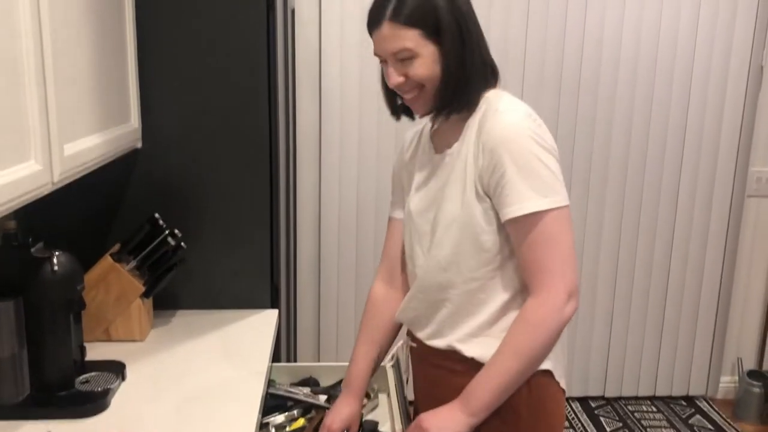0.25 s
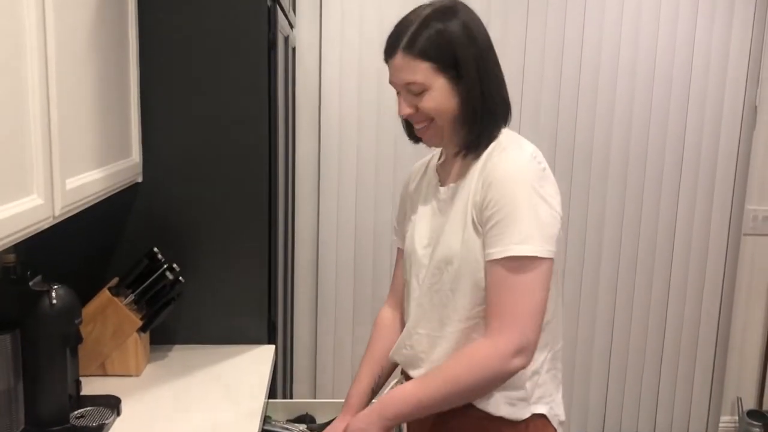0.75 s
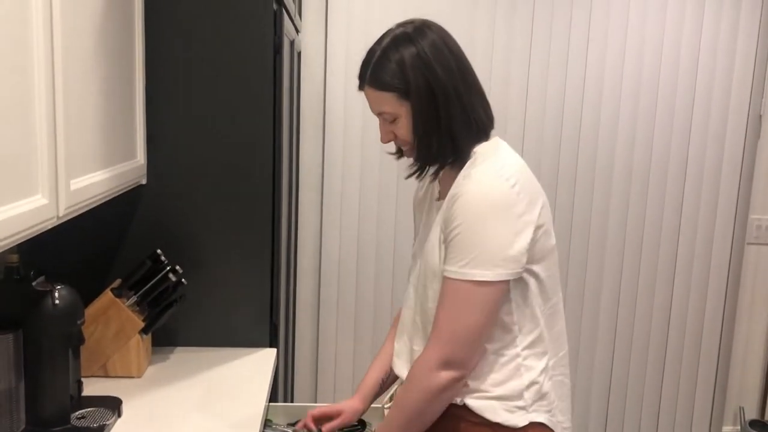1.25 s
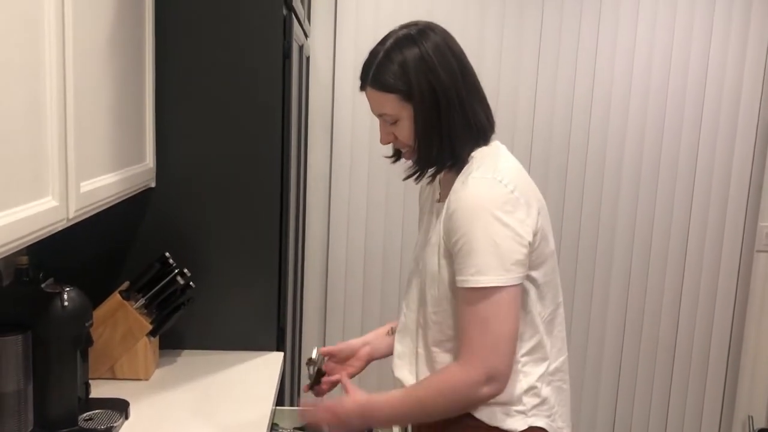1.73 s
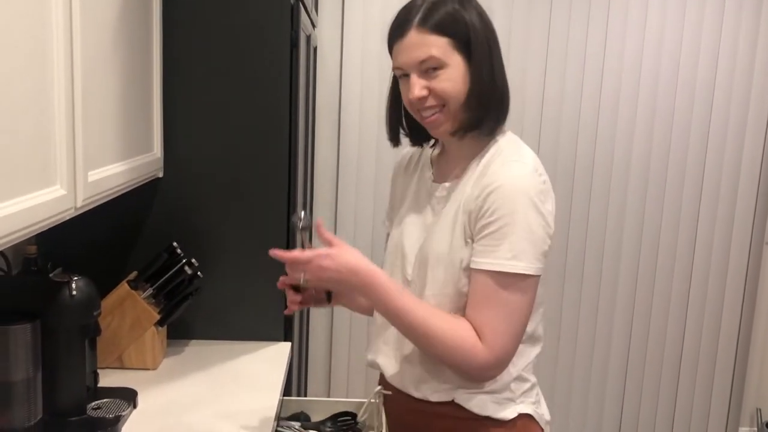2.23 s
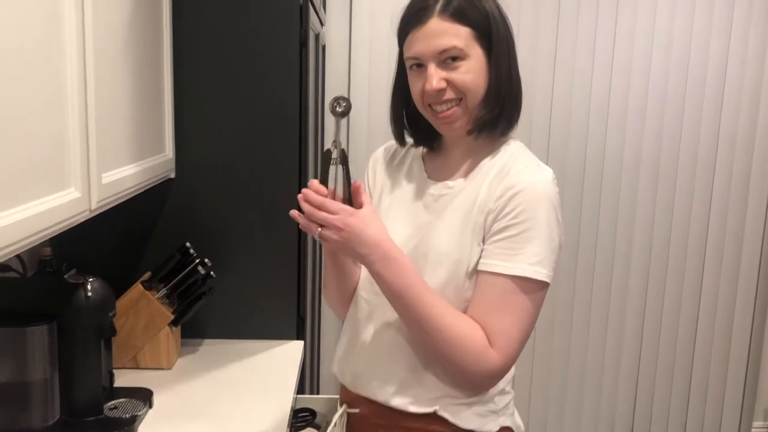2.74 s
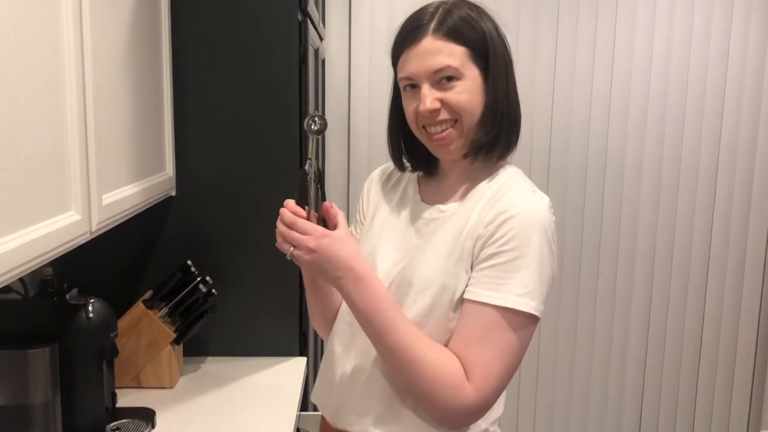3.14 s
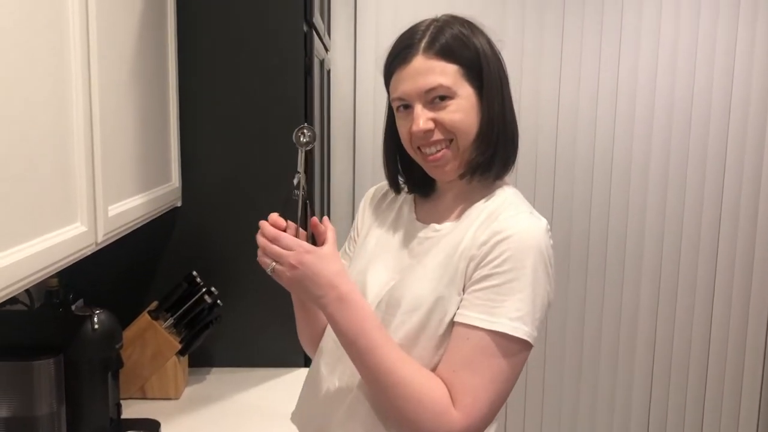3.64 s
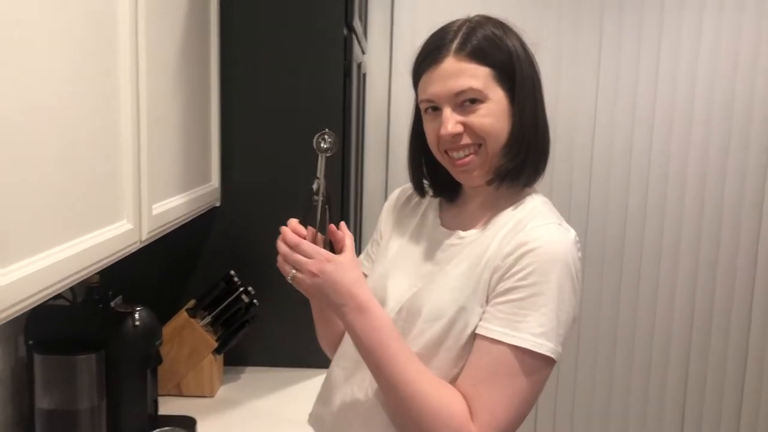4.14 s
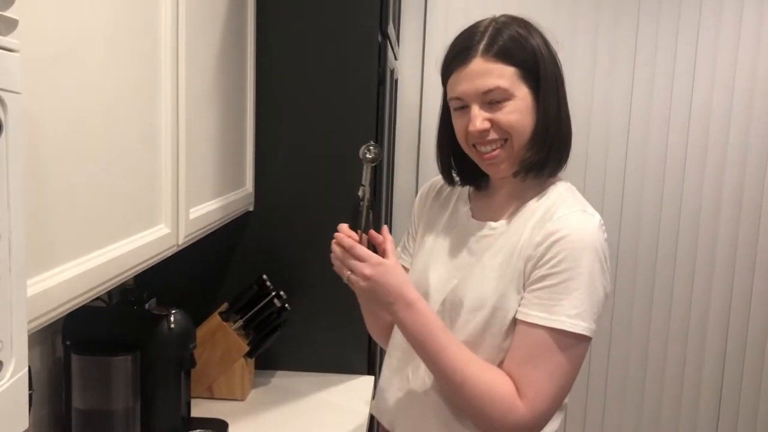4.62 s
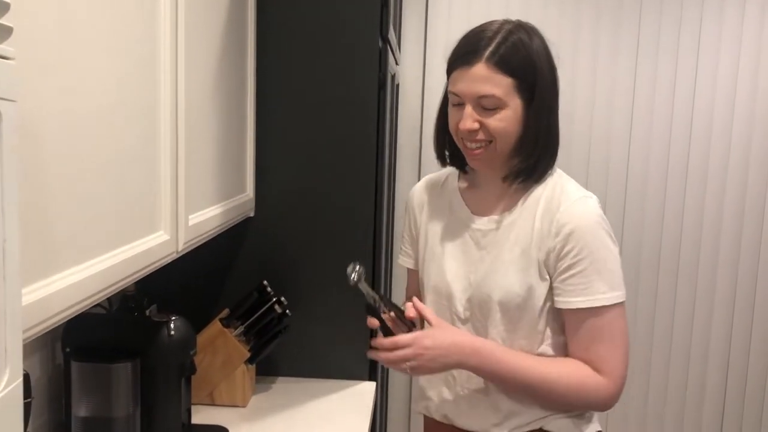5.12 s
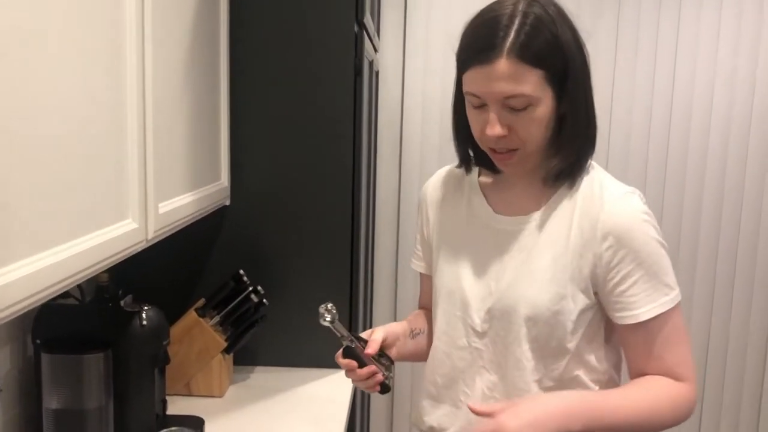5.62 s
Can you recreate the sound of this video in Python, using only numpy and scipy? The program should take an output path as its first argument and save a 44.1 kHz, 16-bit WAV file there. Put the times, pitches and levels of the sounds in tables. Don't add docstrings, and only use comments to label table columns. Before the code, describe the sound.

Steel utensils clatter in a shoved wooden drawer that bangs closed, followed by a dozen quick ratcheting scoop clicks and one dull knock.

```python
import sys
import numpy as np
from scipy import signal
from scipy.fft import rfft, irfft, next_fast_len
from scipy.io import wavfile
from scipy.ndimage import uniform_filter1d, map_coordinates

SR = 44100
rng = np.random.default_rng(int(sys.argv[2]) if len(sys.argv) > 2 else 0)


def to_linear_factor(level_db):
    exponent = np.asarray(level_db, float) / 20
    return 10 ** exponent


def log_audio(samples):
    frames = np.atleast_2d(samples).T
    limited = np.clip(frames, -1, 1)
    pcm = np.round(limited * 32767).astype(np.int16)
    wavfile.write(sys.argv[1], SR, pcm)


N = 258922


def unit(x):
    return x / np.sqrt(np.mean(x ** 2) + 1e-20)


def along(points, hz):
    point_hz, value = np.transpose(points)
    return np.interp(np.log(hz + 1), np.log(point_hz + 1), value)


def filtered(x, response):
    size = next_fast_len(len(x) + 8192)
    return irfft(rfft(x, size) * response(np.fft.rfftfreq(size, 1 / SR)), size)[:len(x)]


def noise(spectrum, size=N, grit_db=0):
    raw = rng.standard_normal(size) * to_linear_factor(grit_db * rng.exponential(1, size))
    return unit(filtered(raw, lambda hz: to_linear_factor(along(spectrum, hz))))


def wobble(rate):
    knots = rng.standard_normal(int(N * rate / SR) + 4)
    return map_coordinates(knots, [np.arange(N) * rate / SR])


def dying(t60, rise, seconds):
    t = np.arange(round(seconds * SR)) / SR
    return to_linear_factor(-60 * t / t60) * (1 - np.exp(-t / rise))


def ring(modes, scatter_db, rise, detune=0, seconds=0.65):
    t = np.arange(round(seconds * SR)) / SR
    total = np.zeros(len(t))
    for hz, db, t60 in modes:
        strength, shift = rng.standard_normal(2)
        tone = np.sin(2 * np.pi * hz * (1 + detune * shift) * t)
        total += to_linear_factor(db + scatter_db * strength) * tone * dying(t60, rise, seconds)
    return total


def add(track, s, x):
    start = round(s * SR)
    track[start:][:len(x)] += x[:N - start]


def curve(rows):
    s, db = np.transpose(rows)
    return np.interp(np.arange(N) / SR, s, db, left=-150, right=-150)


def ramp(start, end, start_db, end_db, t60):
    rise = to_linear_factor(np.linspace(start_db, end_db, round((end - start) * SR)))
    return np.r_[rise, rise[-1] * dying(t60, 1e-5, t60)]


# pitch_hz, width_hz, level_db
BOX_MODES = [(265, 37, 2), (479, 72, -1.5), (1276, 34, -14.5), (1590, 36, -10), (2046, 44, -24.5)]


def boxed(x):
    def lift(f):
        resonance = sum(to_linear_factor(db) * f * w / (c * c - f * f + 1j * f * w) for c, w, db in BOX_MODES)
        return 0.57 + abs(resonance) / to_linear_factor(max(db for _, _, db in BOX_MODES))
    return unit(filtered(x, lift))


# pitch_hz, density_db per Hz
AIR_SPECTRUM = [(13, -58.5), (22, -34), (46, -6.5), (83, -26), (122, -3), (156, -17), (200, -0.5),
                (319, -12.5), (420, -10), (469, -28.5), (539, -20.5), (815, -21.5), (1040, -23.5),
                (1450, -31), (16000, -46.5)]
# pitch_hz, width_hz, level_db
FRIDGE_HUM = [(209, 44, -70.5), (411.7, 21, -77.5), (1031, 22, -80.5)]
# pitch_hz, level_db
COMPRESSOR = (57.5, -69.5)


def kitchen():
    motor_hz, motor_db = COMPRESSOR
    phase = 2 * np.pi * np.cumsum(motor_hz + 0.99 * wobble(3.1)) / SR
    out = to_linear_factor(motor_db + 1.7 * wobble(5.8)) * np.sin(phase)
    for centre, width, db in FRIDGE_HUM:
        band = lambda f: 1 / (1 + (2 * (f - centre) / width) ** 2)
        out += to_linear_factor(db) * unit(filtered(rng.standard_normal(N), band))
    return out + to_linear_factor(-67 + 0.65 * wobble(4.8)) * noise(AIR_SPECTRUM)


# pitch_hz, density_db per Hz
WOOD_SPECTRUM = [(180, -23), (300, -3), (390, -4.5), (478, -4), (600, -3), (1400, -5.5), (4000, -25),
                 (5200, -60), (8800, -120)]
THUD_SPECTRUM = [(24, -55.5), (40, -42.5), (89, -5), (162, -2.5), (235, -6), (320, -7.5), (390, -15),
                 (520, -42), (880, -120)]
CLOTH_SPECTRUM = [(880, -22.5), (1500, -4.5), (1830, -9.5), (4080, -10), (8240, -20), (15100, -29),
                  (16000, -30)]
# time_s, level_db
DRAGGED_LOAD = [(.2, -71), (.3, -78), (.4, -58), (.42, -52), (.63, -53), (.74, -48), (.84, -52.5),
                (.87, -44), (1.1, -55.5)]
# start_s, end_s, start_db, end_db, t60_s
RUNNERS = (1.12, 1.33, -55, -38, 0.89)
# time_s, level_db
HAND_MOVES = [(0, -73.5), (.3, -67.5), (1.7, -74.5), (2.0, -69.5), (2.05, -65.5), (2.4, -62), (2.45, -59),
              (2.62, -57), (2.79, -61), (2.9, -67.5), (3.8, -65.5), (4.0, -65.5), (4.4, -67), (5.33, -68),
              (5.42, -62.5), (5.58, -66.5), (5.68, -65.5), (5.87, -70)]
# time_s, level_db
FOOTSTEPS = [(0, -65), (1.0, -63), (1.5, -58.5), (1.7, -67), (2.05, -66.5), (2.27, -53), (2.5, -55.5),
             (2.88, -57.5), (3.04, -61.5), (3.8, -60), (3.9, -50), (4.06, -63), (4.5, -69.5), (5.4, -69.5),
             (5.6, -67), (5.87, -72)]
# start_s (first tooth), home_s, tooth_db, home_db, scrape_db
SCOOP_SQUEEZES = [(2.8, 2.861, -50, -29.5, -56.5), (3.022, 3.0683, -46, -26.5, -53),
                  (3.174, 3.2143, -46, -29, -53.5), (3.347, 3.397, -39, -30.5, -53.5),
                  (3.5127, 3.56, -41, -28, -53), (3.669, 3.7277, -42, -36.5, -54),
                  (3.8538, 3.902, -40, -28.5, -51.5), (4.04, 4.09, -52, -29.5, -55.5),
                  (4.2174, 4.2585, -44, -24.5, -53.5), (4.435, 4.4834, -50, -30, -55.5),
                  (4.581, 4.622, -54, -24, -55.5), (4.862, 4.8944, -43, -32, -57)]


def handling():
    drag_db, hands_db, feet_db = curve(DRAGGED_LOAD), curve(HAND_MOVES), curve(FOOTSTEPS)
    shut, grip = np.zeros((2, N))
    add(shut, RUNNERS[0], ramp(*RUNNERS))
    for start, _, _, _, db in SCOOP_SQUEEZES:
        add(grip, start, to_linear_factor(db - 3) * dying(0.61, 0.014, 0.61))
    joint = lambda *levels: np.sqrt(np.sum(np.square(levels), axis=0))
    rumble = joint(to_linear_factor(feet_db), to_linear_factor(-61 + 0.4 * (drag_db + 50.5)))
    body = joint(to_linear_factor(drag_db), shut, to_linear_factor(hands_db))
    sleeve = to_linear_factor(-70 + 0.96 * (hands_db + 64))
    rustle = joint(to_linear_factor(drag_db - 20.5), to_linear_factor(-15) * shut, grip, sleeve)
    lumps = wobble(25)
    joists = noise([(30, -40), (55, -4.5), (100, -2.0), (140, -19), (300, -120)])
    out = rumble * to_linear_factor(1.8 * wobble(11) - 6.0) * noise(THUD_SPECTRUM)
    out += to_linear_factor(feet_db - 11.0 + 1.9 * wobble(10)) * joists
    out += body * to_linear_factor(1.4 * lumps - 3) * boxed(noise(WOOD_SPECTRUM, grit_db=1.8))
    return out + rustle * to_linear_factor(1.5 * lumps - 4.0) * noise(CLOTH_SPECTRUM, grit_db=2.5)


# start_s, pitch_hz, level_db, t60_s
SHUDDERS = [
    (3.849, 73.3, -41.5, 0.6),
    (3.883, 55.7, -51, 1),
    (3.95, 71.7, -36.5, 0.24),
]


def boom():
    out = np.zeros(N)
    for s, hz, db, t60 in SHUDDERS:
        add(out, s, ring([(hz, db, t60)], scatter_db=0.5, rise=0.014))
    return out


# start_s, level_db, rub_t60_s
KNOCKS = [
    (3.838, -38.5, 0.035),
    (3.858, -48.5, 0.05),
    (3.873, -46, 0.046),
    (3.905, -49.5, 0.038),
    (3.96, -51.5, 0.02),
]
# pitch_hz, level_db, t60_s
PANEL_MODES = [(114, -11, 0.069), (254, -13, 0.17), (443, -4, 0.08), (478, 4.5, 0.069), (781.5, 2, 0.12),
               (1006, -8, .06), (1165, 4, 0.14), (1222, 2, 0.16), (1265, -5.5, 0.38), (1440, -14, 0.06),
               (1560, -5, .06), (1770, -4, 0.093), (1884, -9, 0.078), (802, -9, 0.45)]


def knock():
    out = np.zeros(N)
    for s, db, t60 in KNOCKS:
        rub = dying(t60, 0.00017, .2) * noise(WOOD_SPECTRUM, size=SR // 5)
        thud = dying(6.0 * t60, 0.0045, .2) * noise(THUD_SPECTRUM, size=SR // 5)
        add(out, s, to_linear_factor(db - 6.0) * ring(PANEL_MODES, scatter_db=1.2, rise=0.001, detune=.012))
        add(out, s, to_linear_factor(db + 2.5) * rub)
        add(out, s, to_linear_factor(db - 3.0) * thud)
    return out


# pitch_hz, level_db, t60_s
CARCASS_MODES = [(114, -10.5, 0.14), (158, -7.5, 0.055), (210, -7, 0.65), (249.6, 1.5, 0.24),
                 (315, -5, 0.21), (462, -3.5, 0.3), (520, -7, 0.24), (720, -13, .4), (797, -15.5, 0.36),
                 (1240, -3.5, .17), (1303, -6, 0.18), (1410, -12, 0.23), (1560, -13.5, 0.21),
                 (2040, -14.5, 0.26)]
# start_s, level_db, hardness_db per octave
HARD_SHOVES = [
    (.261, -52.5, -7.5),
    (.849, -44.5, -2),
    (1.238, -29.5, 0.5),
    (1.262, -39, 1.5),
]


def cabinet():
    out = np.zeros(N)
    for s, db, hard_db in HARD_SHOVES:
        modes = [(hz, level + hard_db * np.log2(hz / 250), t60) for hz, level, t60 in CARCASS_MODES]
        add(out, s, to_linear_factor(db) * ring(modes, scatter_db=1.5, rise=0.006, detune=0.0075))
    return out


# start_s, peak_db, clatter_db (relative), thud_db (relative), hardness_db
DRAWER_JOLTS = [(0.165, -52, -26, -19, 1.5), (0.262, -43.5, -12.5, -7, 0.5), (0.392, -46, -28, -12, -11),
                (0.412, -38.5, -23, -10, 0.5), (0.461, -43, -15.5, -7, -1), (0.478, -39, -18.5, -2.5, 5),
                (0.549, -43.5, -16, -5, -16.5), (0.632, -38, -28.5, -21, 4),
                (0.653, -29.5, -19.5, -22, 1.5), (0.682, -31.5, -26, -7, -3.5), (0.768, -36.5, -25, -6, 3),
                (0.78, -38, -28.5, -9.5, -2), (0.824, -43.5, -30, -12, -3), (0.848, -21.5, -20, -13.5, -1),
                (0.865, -26.5, -29.5, -18, -28), (0.894, -29, -22, -14.5, -7), (0.874, -32.5, -29, -14, -7),
                (0.925, -33.5, -28.5, -14.5, -5), (0.945, -36.5, -30.5, -15, -5),
                (0.975, -37.5, -32.5, -11, -5.5), (1.0, -42.5, -28.5, -8.5, -2.5)]
SLAM_BOUNCES = [
    (1.2362, -19, -6, 0.5, 8.5),
    (1.246, -25, -6, -4, 6.5),
    (1.261, -22.5, -20, -10, -1),
    (1.274, -23, -13, -20.5, -1.5),
    (1.297, -27.5, -11.5, -24, 6),
    (1.32, -34, -18, -7.5, -1),
    (1.345, -34, -11, -7, 1),
    (1.367, -34.5, -10, -14, 1),
    (1.41, -41, -15, -6, 4),
]
SCOOP_FUMBLES = [(2.035, -60, -14, -11, 14), (2.438, -47, -21, -30, 15.5), (2.488, -61, -18, -13, 18),
                 (2.563, -44, -20, -28, 8), (2.6, -52, -21, -17, -9), (2.677, -55, 2, -20, 5),
                 (5.448, -51.5, -10.5, -4, 4.5), (5.826, -40.5, -16, -5, -13)]
# pitch_hz, density_db per Hz
CLATTER_SPECTRUM = [(1060, -32.5), (1800, 2.5), (2670, -5.5), (4210, -3), (5060, -5.5), (6300, -5.5),
                    (15100, -17.5), (16000, -25.5)]


def drawer():
    dull, hard, low, high = np.zeros((4, N))
    for blows, t60 in [(DRAWER_JOLTS, 0.047), (SLAM_BOUNCES, 0.054), (SCOOP_FUMBLES, 0.024)]:
        for s, db, clatter_db, thud_db, hard_db in blows:
            add(dull, s, to_linear_factor(db - 0.5) * dying(t60, 0.0037, .3))
            add(hard, s, to_linear_factor(db + hard_db - 4.5) * dying(1.49 * t60, 0.0032, .3))
            add(low, s, to_linear_factor(db + thud_db + 1.0) * dying(1.93 * t60, 0.0057, .3))
            add(high, s, to_linear_factor(db + clatter_db - 3.0) * dying(2.04 * t60, 0.00082, .3))
    wood = boxed(noise(WOOD_SPECTRUM, grit_db=1.5))
    upper = filtered(wood, lambda f: 1 / (1 + (800 / (f + 1)) ** 4))
    clatter = high * noise(CLATTER_SPECTRUM, grit_db=3.0)
    uneven = to_linear_factor(wobble(160))
    return dull * (wood - upper) + uneven * (hard * upper + clatter) + low * boxed(noise(THUD_SPECTRUM))


# start_s, pitch_hz, level_db, t60_s
SINGING_MODES = [(.258, 15100, -59, .12), (.258, 6140, -66, 0.12), (.46, 5700, -54.5, 0.11),
                 (.465, 6150, -52, 0.16), (.46, 7800, -56, .06), (.46, 3860, -47, .04),
                 (.68, 6800, -57, 0.14), (.27, 12200, -66, .1), (.47, 12300, -60, .08),
                 (.535, 14800, -64, .15), (.855, 12200, -58, .08), (.85, 1500, -38, .04),
                 (2.556, 6510, -54.5, 0.086), (2.558, 5600, -57, .12), (2.557, 4630, -56, 0.15),
                 (2.556, 8350, -67, 0.043), (2.559, 1480, -49, 0.079), (2.56, 943, -51.5, 0.11),
                 (2.49, 1650, -48, 0.045), (4.26, 10360, -63, .12), (4.258, 6020, -50, 0.095),
                 (4.622, 4950, -52, .06), (4.623, 3150, -60, .22), (4.623, 2400, -57, .12),
                 (4.623, 7200, -49, 0.09), (4.835, 2950, -53, 0.04), (4.828, 14600, -55, .03)]


def clinks():
    out = np.zeros(N)
    t = np.arange(SR // 2) / SR
    for s, hz, db, t60 in SINGING_MODES:
        drift = np.cumsum(rng.standard_normal(len(t))) * .2 * np.minimum(hz / 4000, 1)
        add(out, s, to_linear_factor(db) * np.sin(2 * np.pi * hz * t + drift) * dying(t60, 0.0013, .5))
    return out


# start_s, peak_db, brightness_db per octave
LOOSE_TICKS = [(0.2571, -48.5, -1.5), (0.408, -49, -8), (0.421, -43.5, -1), (0.4602, -37, 0.5),
               (0.472, -44, 6), (0.535, -54, 6), (0.768, -49, -9.5), (0.893, -42, -4.5), (1.297, -34, -2),
               (1.37, -44, -3), (0.6429, -41.5, -12), (0.6509, -47, 2), (0.849, -45, 16),
               (1.2353, -15.5, -2), (2.003, -48.5, 7), (2.0116, -59.5, -4.5), (2.0764, -59, 5),
               (2.431, -51, -13), (2.5569, -45, -12), (2.6758, -44, -6), (5.105, -47, -7), (1.134, -72, -9),
               (5.598, -54, -28), (5.623, -58, 0), (5.642, -52, -16), (5.824, -58.5, -9)]
# start_s, peak_db, brightness_db per octave
TOOTH_SNAGS = [(2.8098, -33.5, 2), (2.815, -41, 0), (2.8382, -30.5, 1.5), (2.852, -39, -2), (3.033, -41, 0),
               (3.043, -38, 2), (3.058, -35.5, -1), (3.172, -50, 6), (3.1833, -33, 3), (3.192, -32, 4),
               (3.2, -28.5, 2.5), (3.353, -45, -2), (3.367, -41, 2), (3.382, -39, 2), (3.51, -52, 8),
               (3.5211, -35.5, 2), (3.526, -33, 0), (3.541, -43, -4), (3.548, -47, -2), (3.6995, -44, 1),
               (3.706, -39, -3), (3.714, -49, -3), (3.8634, -34, 8), (3.884, -36, 0), (4.0475, -34.5, -1),
               (4.244, -35, 2), (4.4296, -43, 1), (4.442, -35, 2), (4.212, -48, 8), (4.5912, -44, 6),
               (4.621, -40, 5), (4.8132, -46, -5), (4.827, -39, 5), (4.8346, -37, -2), (4.8745, -44, 5)]
# pitch_hz, density_db per Hz
STEEL_SPECTRUM = [(530, -52), (900, -20.5), (1880, -0.5), (3200, -0.5), (5500, 2), (8000, -1.5),
                  (12000, -2.5), (16000, -6.5)]
# pitch_hz, level_db, t60_s
SCOOP_MODES = [(1500, 7, 0.022), (1820, -19.5, 0.0079), (2716, -1.5, 0.026), (3270, 11.5, 0.058),
               (4000, 6, 0.012), (4680, -4, 0.036), (5600, -16, .02), (6540, 3, .025), (7160, -1, 0.012),
               (8250, -1.5, 0.022), (8900, -11, .015), (10360, -18, .02), (13100, -7.5, 0.021),
               (13000, -4, .015), (14500, -1.5, .015)]
# delay_s, level_db
WORKTOP = (0.0048, -5)


def ticks():
    out = np.zeros(N)
    delay_s, echo_db = WORKTOP
    delay = round(delay_s * SR)
    # start s, peak dB, brightness dB per octave, ring dB, rattle rise s
    contacts = [(*tick, -12, .0005) for tick in LOOSE_TICKS]
    contacts += [(*snag, -18, .0022) for snag in TOOTH_SNAGS]
    for start, home, tooth_db, home_db, _ in SCOOP_SQUEEZES:
        contacts += [(start, tooth_db, 11, -18, .0022), (home, home_db, 1, -17, .0005)]
    for s, db, bright_db, ring_db, rise in contacts:
        edge_hz = np.clip(1100 * to_linear_factor(0.42 * (-28.5 - db)), 1000, 2800)
        colour = lambda f: to_linear_factor(bright_db * np.log2((f + 1) / 5000)) / (1 + (edge_hz / (f + 1)) ** 6)
        crack = .7 * dying(0.003, .0001, .15)
        shape = crack + to_linear_factor(echo_db) * np.roll(crack, delay) + 0.76 * dying(.034, rise, .15)
        blow = np.zeros(len(shape))
        blow[[30, 30 + delay]] = 1, to_linear_factor(echo_db)
        blow = filtered(blow, lambda f: colour(f) * to_linear_factor(along(STEEL_SPECTRUM, f)))
        rattle = unit(filtered(noise(STEEL_SPECTRUM, size=len(shape), grit_db=-1.3), colour))
        modes = [(hz, level, min(t60, .008)) for hz, level, t60 in SCOOP_MODES if hz > edge_hz]
        steel = ring(modes, scatter_db=3, rise=.0003, detune=.05, seconds=.03)
        add(out, s, to_linear_factor(db - 4) * blow / blow.max())
        add(out, s, to_linear_factor(db - 7.0) * rattle * shape)
        add(out, s, to_linear_factor(db + ring_db - 9) * steel)
    return out


def patchy(x, patch_db):
    z = signal.stft(x, nperseg=128)[2]
    field = uniform_filter1d(rng.standard_normal(z.shape), size=5, axis=0)
    field = unit(uniform_filter1d(field, size=9, axis=1))
    return unit(signal.istft(z * to_linear_factor(patch_db * field), nperseg=128)[1][:len(x)])


# pitch_hz, density_db per Hz
RACK_SPECTRUM = [(1060, -26), (1800, -19), (2520, -4.5), (4000, -1), (6300, -0.5), (10000, -4.5),
                 (16000, -6)]
# start_s, end_s, level_db
SHORT_SCRAPES = [
    (4.828, 4.842, -56.5),
    (5.622, 5.652, -67.5),
    (5.829, 5.866, -65),
]


def rack():
    level = np.zeros(N)
    strokes = [(start - 0.00046, home + 0.0027, db) for start, home, _, _, db in SCOOP_SQUEEZES]
    for start, end, db in strokes + [*SHORT_SCRAPES]:
        add(level, start, ramp(start, end, db - 0.5, db + 0.5, 0.053))
    level = uniform_filter1d(level, size=40)
    scrape = patchy(noise(RACK_SPECTRUM, grit_db=1.9), patch_db=3)
    spring = filtered(scrape, lambda f: 1 / (1 + (8000 / (f + 1)) ** 8))
    blade = (scrape - spring) * to_linear_factor(1.5 * wobble(150))
    return level * to_linear_factor(3.0 * wobble(700)) * (blade + spring * to_linear_factor(-1.5 + 0.9 * wobble(200)))


# pitch_hz, t60_s
WALL_DECAY = [(60, 0.37), (200, 0.16), (700, 0.57), (2000, 0.72), (5000, 0.66), (11000, 0.41)]
# pitch_hz, level_db
WALL_LEVEL = [(100, -4), (1000, -2.5), (5000, -4), (12000, -7.5)]


def walls(x, count=5):
    turn = np.arange(N) / (.07 * SR) % count
    out = np.zeros(N)
    for k in range(count):
        hz, t, z = signal.stft(rng.standard_normal(SR), SR, nperseg=256)
        fall = to_linear_factor(-60 * t / along(WALL_DECAY, hz)[:, None])
        fall = fall / np.linalg.norm(fall, axis=1, keepdims=True) * to_linear_factor(along(WALL_LEVEL, hz))[:, None]
        tail = signal.istft(z * fall, SR, nperseg=256)[1] / np.sqrt(128)
        distance = np.minimum(abs(turn - k), count - abs(turn - k))
        share = np.clip(1 - distance, 0, 1)
        delayed = np.r_[np.zeros(200), tail]
        out += signal.fftconvolve(x * np.sqrt(share), delayed)[:N]
    return out


def scene():
    near = drawer() + cabinet() + ticks() + clinks() + rack() + knock()
    no_bass = signal.butter(N=3, Wn=60, btype="high", fs=SR, output="sos")
    near = signal.sosfilt(no_bass, near + walls(near))
    return (near + boom() + handling() + kitchen())[None]


def band_limit(x):
    return signal.sosfilt(signal.butter(12, 16500, fs=SR, output="sos"), x)


def record(dry):
    kept = filtered(dry[0], lambda hz: np.clip((16060 - hz) / 150, 0, 1))
    return band_limit(kept[None])


dry = scene()
out = record(dry)
log_audio(out)
```